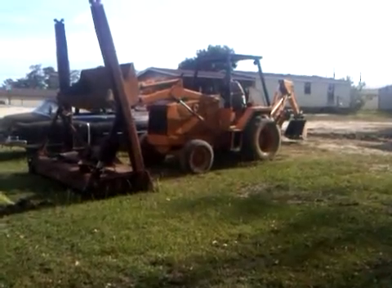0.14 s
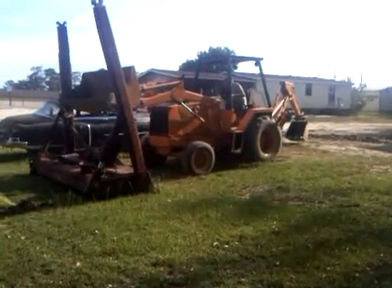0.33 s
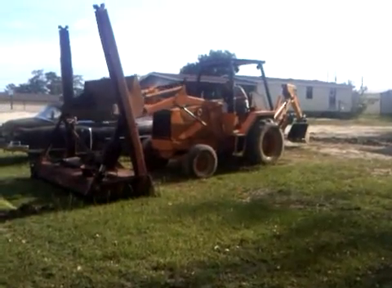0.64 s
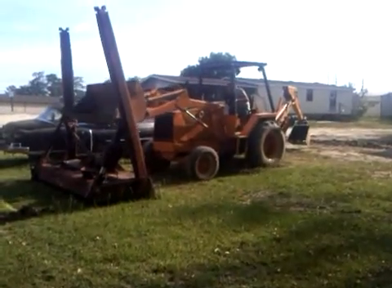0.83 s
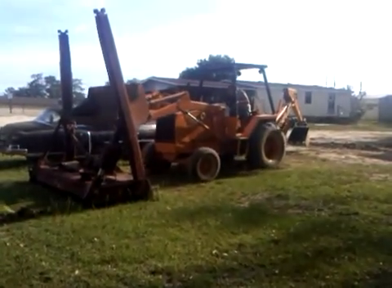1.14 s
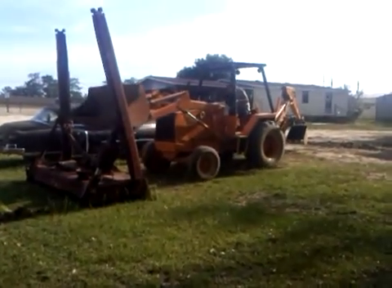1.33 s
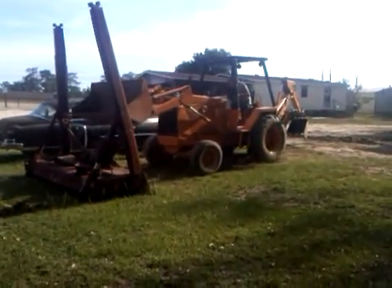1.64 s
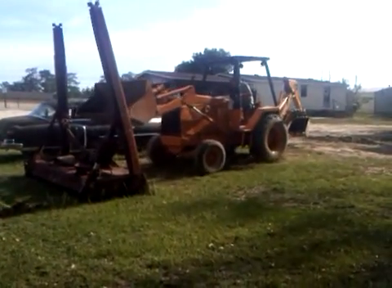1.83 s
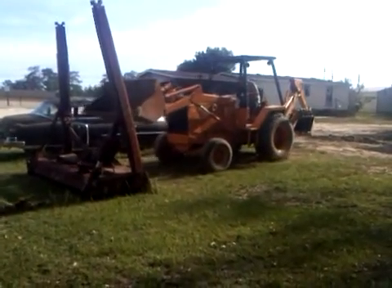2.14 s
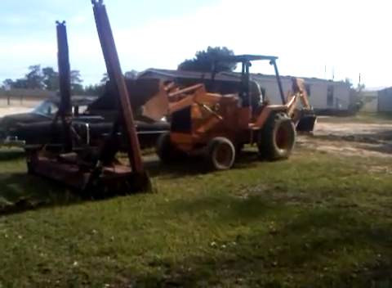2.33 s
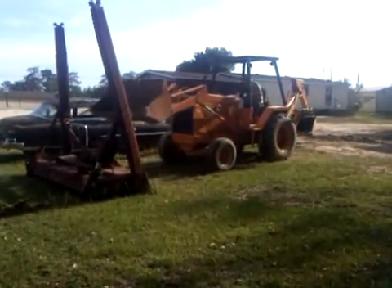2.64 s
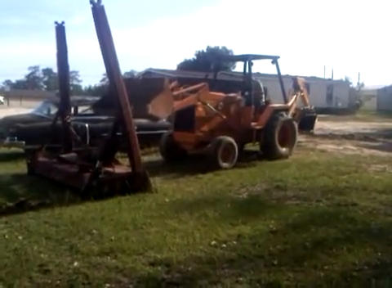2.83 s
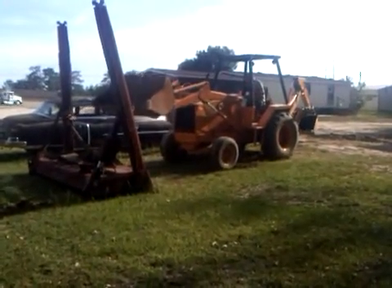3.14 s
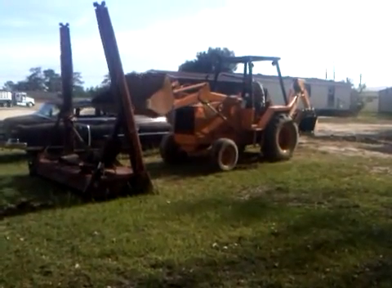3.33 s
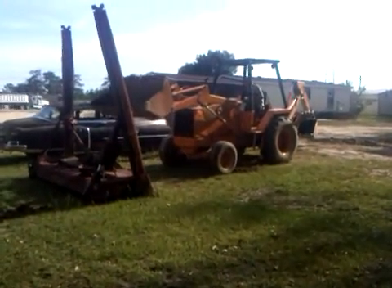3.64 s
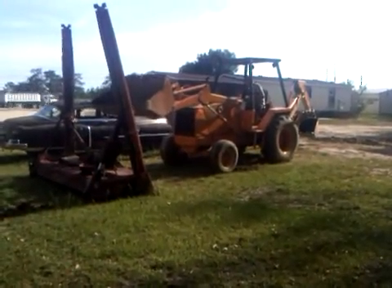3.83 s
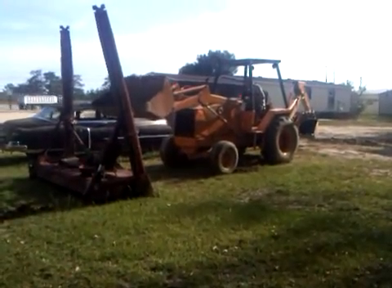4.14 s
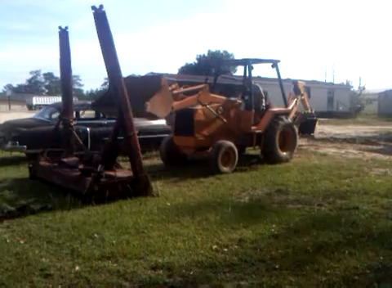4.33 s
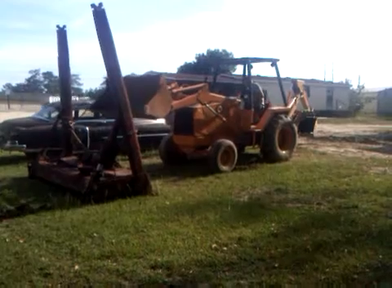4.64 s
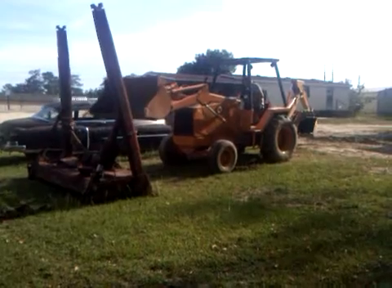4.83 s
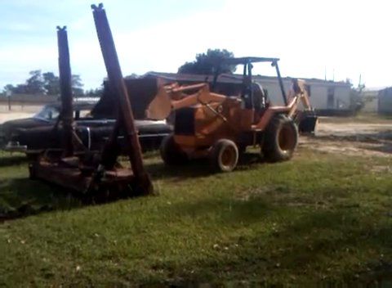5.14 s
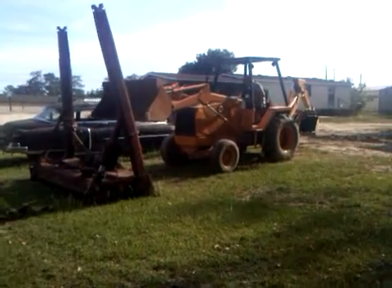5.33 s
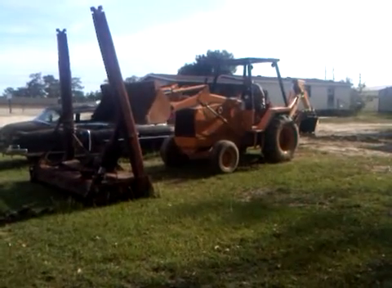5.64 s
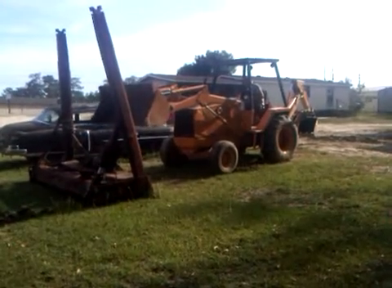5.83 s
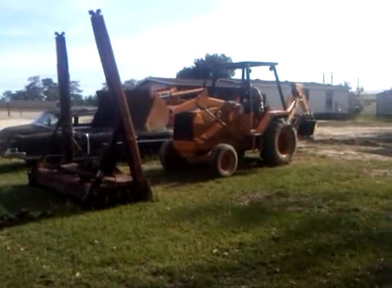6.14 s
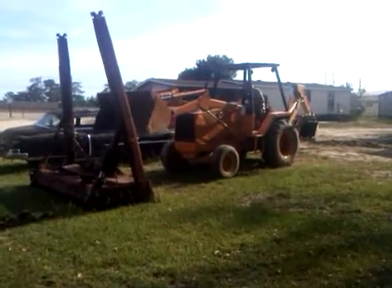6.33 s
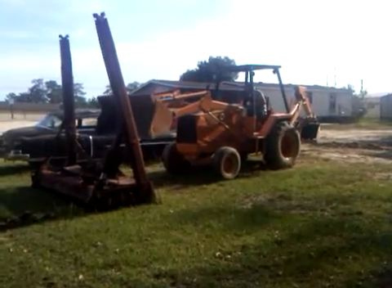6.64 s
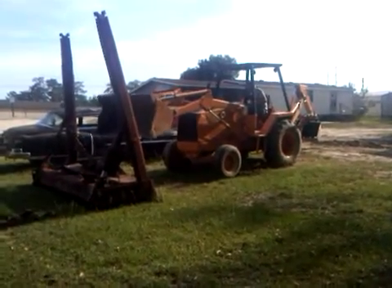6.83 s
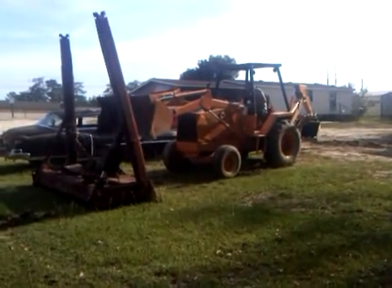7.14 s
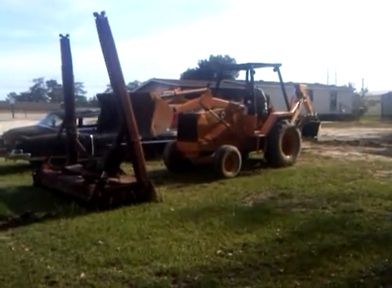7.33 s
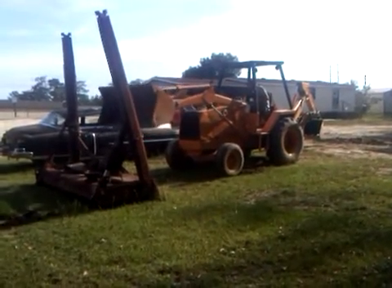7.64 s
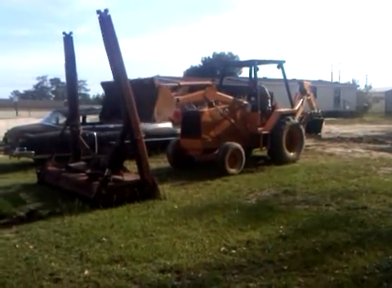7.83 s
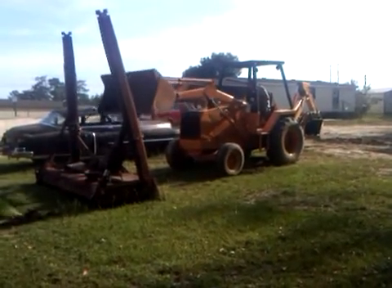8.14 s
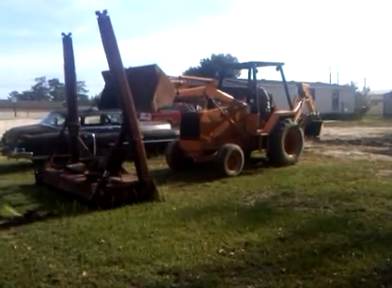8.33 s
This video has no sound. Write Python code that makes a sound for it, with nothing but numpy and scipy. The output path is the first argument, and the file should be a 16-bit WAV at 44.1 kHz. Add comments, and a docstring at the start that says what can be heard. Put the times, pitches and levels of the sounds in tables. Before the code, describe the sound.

A worn diesel backhoe works outdoors at some distance, in dry, single-channel sound with dulled highs. From 0 to 0.5 s it stumbles with deep pipe coughs and clustered steel knocks. Around 0.5 s it revs up: firings quicken into a raspy, booming roar, with fan hum and gear noise swelling, hood panels rattling and bright clanks at about 0.7, 0.8, 1.3 and 1.7 s. Near 2.0 s the throttle shuts, and speed and loudness fall quickly, with a thin belt squeak at 2.3 s. From 2.5 s it hunts at a slow idle, fed roughly every 0.3 s: a few hard thumping, clattering firings, then softer coasting. Bucket and arms clunk dully at 3.3-3.6 s and once at 4.3 s. Short rising belt chirps come at 3.9, 4.2, 4.8, 5.8 and 7.2 s. Coughs strengthen after 6.4 s; steel knocks crowd 7.8-8.4 s, ending mid-idle with a last chirp.

```python
"""An old backhoe loader, some way off in a yard, revs up once and drops to a hunting idle: the governor
feeds a few hard, knocking firings, lets the engine coast, and feeds it again. One train of firings drives
filtered pulses and noise for exhaust, pipe, block, gas, frame, fan and gears. Hums and coughs of the pipe
are decaying tones; loose steel, panels and bucket are struck modes; a slack belt chirps as tone and fuzz."""
import sys
import numpy as np
from scipy import signal
from scipy.fft import rfft, irfft, next_fast_len
from scipy.io import wavfile

SR = 44100
rng = np.random.default_rng(int(sys.argv[2]) if len(sys.argv) > 2 else 0)


def unload_wav(signal):
    """Save mono or channel-first audio to the path in sys.argv[1] as 16-bit WAV at rate SR, clipped to [-1, 1]."""
    wavfile.write(
        sys.argv[1],
        SR,
        np.round(np.clip(np.atleast_2d(signal).T, -1, 1) * 32767).astype(np.int16),
    )


N = 373527
TIME = np.arange(N) / SR

# Feeds of fuel by the governor. Each row: start in seconds, length in seconds, exhaust thump in dB,
# block clatter in dB, hiss in dB.
FEEDS = [(0.01, 0.099, -49.5, -43.5, -52), (0.264, 0.12, -55.5, -40.5, -52), (2.47, 0.06, -45, -44.5, -48),
         (2.798, 0.049, -47, -47.5, -52), (3.107, 0.067, -45.5, -48.5, -53.5),
         (3.44, 0.096, -46.5, -48, -51.5), (3.734, 0.16, -48, -50, -51.5), (4.086, 0.081, -44, -49, -53.5),
         (4.406, 0.074, -47.5, -48.5, -54.5), (4.719, 0.086, -46.5, -52.5, -57.0),
         (4.992, 0.061, -45, -47.5, -53), (5.326, 0.075, -46, -45.5, -49), (5.501, 0.032, -48, -45.5, -46),
         (5.628, 0.096, -55, -50, -54), (5.893, 0.08, -47, -48.5, -56.5), (6.202, 0.16, -46.5, -48.5, -55),
         (6.565, 0.027, -43, -44.5, -53.5), (6.73, 0.21, -49.5, -53, -57), (7.052, 0.088, -48, -48.5, -54),
         (7.317, 0.11, -53, -51, -53), (7.546, 0.088, -43.5, -52, -50), (7.865, 0.053, -49.5, -50, -54),
         (8.106, 0.092, -51.5, -44, -51), (8.316, 0.15, -46, -48.5, -59)]
# Modes of the thin hood panels. Each row: frequency in Hz, relative level in dB, t60 in seconds.
PANELS = [(1740, 4, 0.045), (2024, 7.5, 0.042), (2160, 4, 0.031), (2278, 13, 0.035), (2400, 13.5, 0.036),
          (2635, 8, 0.071), (3060, 1.5, 0.098)]


def amp(db):
    """Decibels to amplitude."""
    return 10 ** (np.asarray(db) / 20)


def evened(x):
    """Scales to rms 1."""
    return x / np.sqrt(np.mean(x ** 2) + 1e-20)


def curves(rows):
    """Each column of a table after the first, interpolated over the times in the first."""
    s, *columns = np.transpose(rows)
    return [np.interp(TIME, s, column) for column in columns]


def add(mix, s, sound):
    """Lays a sound into the mix at time s."""
    part = mix[max(round(s * SR), 0):][:len(sound)]
    part += sound[:len(part)]


def earlier(x, seconds):
    """Moves a signal ahead in time."""
    return np.interp(TIME + seconds, TIME, x)


def blend(idle, fast, share):
    """Equal-power mix of two sounds, each at rms 1."""
    return np.sqrt(1 - share) * evened(idle) + np.sqrt(share) * evened(fast)


def colour(x, points, size=16384):
    """Minimum-phase filter with the given spectrum, interpolated over log frequency."""
    hz, db = np.transpose(points)
    bin_hz = abs(np.fft.fftfreq(size, 1 / SR))
    log_gain = np.log(amp(np.interp(np.log(bin_hz + 1), np.log(hz), db)))
    taps = np.fft.ifft(np.exp(np.conj(signal.hilbert(log_gain)))).real
    return signal.oaconvolve(x, taps[:size // 2])[:N]


def resonate(x, hz, width_hz):
    """One resonance of gain 1."""
    return signal.lfilter(*signal.iirpeak(hz, hz / width_hz, SR), x)


def flutter(db, rate_hz):
    """Gain that wanders at random, with an rms swing in dB."""
    s = TIME[::SR // 300]
    hz = np.fft.rfftfreq(len(s), s[1])
    band = (hz > 6) * np.exp(-(hz / rate_hz) ** 2)
    wander = irfft(rfft(rng.standard_normal(len(s))) * band, len(s))
    return np.interp(TIME, s, amp(db * evened(wander)))


def swell(start, length, shape, times=TIME):
    """Exponential attack up to the start, hold, and release, of height 1."""
    attack_s, hold_share, release_s = shape
    t = times - start
    attack = np.minimum(t, 0) / attack_s
    release = np.maximum(t - hold_share * length, 0) / release_s
    return np.exp(np.maximum(attack - release, -20))


def fed(coast_db, shape, column):
    """Level in dB of one part: the power of coasting plus a swell at each feed, from that column of FEEDS."""
    s = TIME[::20]
    power = sum((amp(row[column]) * swell(row[0], row[1], shape, s)) ** 2 for row in FEEDS)
    return 10 * np.log10(amp(coast_db) ** 2 + np.interp(TIME, s, power))


def firings(speed):
    """One impulse a firing, of even mean power at any speed; firings grow more alike as the engine speeds up."""
    # Strength of each of the four cylinders. Each entry: level in dB.
    cylinders_db = [0.78, 0.016, -0.13, -2]
    # The throttle opens and shuts. Each entry: time in seconds.
    throttle_s = [0.528, 2.024]
    spread_db = 4  # at the lowest speed

    turns = np.cumsum(speed) / SR
    # slip the phase so that each change of fuel falls on a firing
    changes = np.sort([row[0] for row in FEEDS] + list(throttle_s))
    slip = np.unwrap(2 * np.pi * (np.interp(changes, TIME, turns) % 1)) / (2 * np.pi)
    at = np.flatnonzero(np.diff(np.floor(turns - np.interp(TIME, changes, slip))))
    chance = rng.standard_normal(N)[:len(at)] * (speed.min() / speed[at]) ** 2
    train = np.zeros(N)
    train[at] = amp(np.resize(cylinders_db, len(at)) + spread_db * chance) / np.sqrt(speed[at])
    return train


def bursts(train, rise_s, decay_s, steady):
    """Noise that swells at each firing and dies away, over a steady part."""
    t = TIME[:SR // 6]
    shape = (1 - np.exp(-t / rise_s)) ** 2 * np.exp(-t / decay_s)
    power = abs(signal.oaconvolve(train ** 2, shape)[:N])
    return evened(rng.standard_normal(N) * np.sqrt(power / power.mean() + steady))


def pops(train):
    """Compact bumps of exhaust pressure, centred on the firings, each followed by an uneven suck back."""
    # Each row: frequency in Hz, relative gain in dB.
    pop_spectrum = [(8, -30.5), (28, -8), (42, 7), (82, 7), (125, -3.5), (170, -10), (260, -18), (900, -55)]
    return_rad, return_spread_rad = 0.55, 0.3

    hz, db = np.transpose(pop_spectrum)
    size = next_fast_len(N)
    gain = amp(np.interp(np.log(np.fft.rfftfreq(size, 1 / SR) + 1), np.log(hz), db))
    angle = return_rad + return_spread_rad * rng.standard_normal(N)
    # turn the phase of each bump by its own angle
    upright = rfft(train * np.cos(angle), size)
    turned = 1j * rfft(train * np.sin(angle), size)
    return irfft((upright + turned) * gain, size)[:N]


def exhaust_thump(train, puffs, flow, revving):
    """Pulses with ragged gas flow at idle, compact pressure bumps at speed."""
    # Each row: frequency in Hz, relative gain in dB.
    thump_spectrum = [(8, -29.5), (24, 3), (40, -2.5), (53, 14), (66, -7), (84, 5.5), (125, -13),
                      (190, -38.5), (400, -35), (900, -62.5)]
    return blend(colour(puffs + flow, thump_spectrum), pops(train), revving)


def pipe_boom(puffs, flow, revving):
    """At speed clean pulses rule the pipe; at idle ragged gas flow keeps it booming."""
    # Pipe under ragged flow. Each row: frequency in Hz, relative gain in dB.
    gas_spectrum = [(60, -41), (95, -9), (120, 4), (140, -5), (165, -10.5), (205, -6), (250, -4),
                    (300, -20.5), (500, -69.5)]
    # Pipe under clean pulses. Each row: frequency in Hz, relative gain in dB.
    pulse_spectrum = [(80, -25), (106, 16.5), (130, -2), (165, -17.5), (196, -3), (213, 8.5), (236, -12.5),
                      (290, -22.5), (340, -7), (410, -19.5), (520, -10.5), (650, -41.5)]
    ragged = colour(0.7 * puffs + flow, gas_spectrum)
    return blend(ragged, colour(puffs, pulse_spectrum), 0.92 * revving)


def ringing(train, decay_s):
    """Every firing rings the same dense set of modes, so fine strands form at multiples of the firing rate."""
    t = TIME[:SR // 8]
    response = rng.standard_normal(len(t)) * np.exp(-t / decay_s)
    return evened(signal.oaconvolve(train, response)[:N])


def rattle(drive, uneven_db=6, width_hz=35):
    """Each panel mode is shaken by the engine in fits of its own."""
    return evened(sum(amp(db) * resonate(drive, hz, width_hz) * flutter(uneven_db, rate_hz=2.9)
                      for hz, db, _ in PANELS))


def block_clatter(train, revving):
    """The block clatters unevenly at idle and rasps at speed; the engine shakes the hood panels."""
    # Block at idle. Each row: frequency in Hz, relative gain in dB.
    idle_spectrum = [(600, -29.5), (1000, 2), (1220, 6), (1420, -7.5), (1570, 6.5), (1680, 1), (2050, 2.5),
                     (2450, -3), (3000, -3.5), (3700, -5), (4400, -18), (7000, -56.5)]
    # Block at speed. Each row: frequency in Hz, relative gain in dB.
    rasp_spectrum = [(600, -27.5), (1000, -2.5), (1450, -6), (1700, 0.5), (1930, -2.5), (2060, 0),
                     (2200, -6.5), (2400, -4.5), (2650, -9), (3200, -17), (4300, -12.5), (7000, -51.5)]
    # Panel rattle, most in the pick-up of speed. Each row: time in seconds, level in dB against the block.
    rattle_level = [(0.62, -19.5), (0.8, 0), (1.05, -2), (1.45, -11.5)]

    slap = bursts(earlier(train, 0.0076), rise_s=0.0016, decay_s=0.0019, steady=26.0)
    rasp = bursts(earlier(train, 0.0076), rise_s=0.00063, decay_s=0.017, steady=0.34)
    rasp = rasp + 0.8 * ringing(earlier(train, 0.0068), decay_s=0.022)
    rasp = rasp * flutter(1, rate_hz=45)
    uneven_slap = slap * flutter(1.9, rate_hz=56)
    clatter = blend(colour(uneven_slap, idle_spectrum), colour(rasp, rasp_spectrum), revving)
    return evened(clatter + amp(curves(rattle_level)[0]) * rattle(slap))


def gas_hiss(train):
    """Exhaust gas: short noise bursts at the firings over steady noise."""
    # Each row: frequency in Hz, relative gain in dB.
    hiss_spectrum = [(1500, -20.5), (3000, -4.5), (3800, -11), (3990, 1.5), (4200, 5.5), (5000, 3.5),
                     (6200, -1.5), (7000, -8), (7600, -36.5)]
    gas = bursts(earlier(train, 0.0042), rise_s=0.0013, decay_s=0.0042, steady=3.5)
    return evened(colour(gas * flutter(1.87, rate_hz=56), hiss_spectrum))


def frame_rumble(train):
    """Frame shaken by the firings: slow noise bursts over mostly steady noise."""
    # Each row: frequency in Hz, relative gain in dB.
    rumble_spectrum = [(180, -19.5), (290, 2.5), (350, 7), (400, -0.5), (470, 2.5), (540, 3.5), (620, -3),
                       (900, -46.5)]
    shake = bursts(earlier(train, 0.0017), rise_s=0.0049, decay_s=0.048, steady=5.7)
    return evened(colour(shake * flutter(1.9, rate_hz=82), rumble_spectrum))


def fan_and_gear_roar(train):
    """Fan and gears: fluttering noise that swells with the firings."""
    # Each row: frequency in Hz, relative gain in dB.
    roar_spectrum = [(450, -27.5), (630, 0), (705, 10), (750, 5.5), (810, 9), (930, 4.5), (1030, -2.5),
                     (1150, -2.5), (1400, -4.5), (3000, -57.5)]
    churn = bursts(earlier(train, 0.0017), rise_s=0.0017, decay_s=0.034, steady=2.2)
    return evened(colour(churn * flutter(2.0, rate_hz=30), roar_spectrum))


def fan(speed):
    """Belted blades hum between the engine's own tones, gliding with its speed."""
    # Each row: multiple of the blade rate, rms level in dB at full speed before flutter.
    fan_tones = [(1, -44), (2, -52.5), (4, -57.5)]
    blades_per_firing, speed_power = 4.17, 5

    turns = blades_per_firing * np.cumsum(speed) / SR
    hum = sum(amp(db) * np.sin(2 * np.pi * round(k) * turns) * flutter(1.4, rate_hz=30) for k, db in fan_tones)
    return np.sqrt(2) * hum * (speed / speed.max()) ** speed_power


def engine():
    """Each firing thumps out of the pipe, sets it booming, rattles the block and puffs gas."""
    # Governed speed between feeds. Each row: time in seconds, firings per second.
    base_speed = [(0.2, 24.3), (0.55, 33.87), (0.95, 42.16), (1.28, 43.06), (1.6, 39.43), (2.02, 39.74),
                  (2.25, 33), (2.6, 21), (7.8, 21), (8.2, 25.5)]
    # Firing effort between feeds, through the rev and down to coasting. Each row: time in seconds,
    # exhaust thump in dB, block clatter in dB, hiss in dB.
    effort = [(0.17, -60.5, -53, -57), (0.43, -50.5, -43, -49), (0.57, -31.5, -39, -48),
              (0.87, -35, -34.5, -44), (2.02, -37, -36.5, -48), (2.08, -49, -47.5, -54.5),
              (2.4, -56, -50, -52), (2.65, -68.5, -51, -65.5), (5.2, -54, -53.5, -67),
              (8.47, -48, -51, -67.5)]
    # Slower parts between feeds. Each row: time in seconds, pipe boom in dB, frame rumble in dB,
    # roar of fan and gears in dB.
    body = [(0.15, -47.5, -58.5, -54), (0.47, -47, -49.5, -52.5), (0.61, -41, -43.5, -44),
            (0.92, -42, -46, -39.5), (1.2, -38, -42, -38), (1.79, -38, -48.5, -42), (2.06, -44, -46, -39.5),
            (2.12, -46, -54, -49.5), (3, -51, -56.5, -55), (4, -49.5, -59.5, -54), (5, -50.5, -55, -52.5),
            (6.8, -50, -59, -49), (7.8, -49.5, -58, -55), (8.47, -48.5, -57.5, -50)]
    # The frame shudders as the loader works. Each row: start in seconds, length in seconds, level in dB.
    shudders = [(3.18, 0.082, -48), (3.363, 0.02, -45), (3.5, 0.038, -49), (4.319, 0.49, -50),
                (4.796, 0.64, -53.5), (8.326, 0.14, -48)]
    # Answers to a feed or shudder. Each: attack in seconds, hold as a share of its length, release in seconds.
    thump_shape = (0.11, .78, 0.082)
    clatter_shape = (0.037, 0.83, 0.079)
    hiss_shape = (0.039, 1.54, 0.012)
    surge_shape = (.05, 1.1, .07)
    shudder_shape = (0.01, 0.42, 0.021)
    # what a feed adds
    surge_firings_per_s = 3
    boom_surge_db, rumble_surge_db, roar_surge_db = 4, 3.5, 3

    surge = np.max([swell(row[0], row[1], surge_shape) for row in FEEDS], axis=0)
    speed = curves(base_speed)[0] + surge_firings_per_s * surge
    thump_db, clatter_db, hiss_db = curves(effort)
    thump_db = fed(thump_db, thump_shape, column=2)
    clatter_db = fed(clatter_db, clatter_shape, column=3)
    hiss_db = fed(hiss_db, hiss_shape, column=4)
    boom_db, rumble_db, roar_db = curves(body)
    shudder = sum(amp(db) * swell(s, length, shudder_shape) for s, length, db in shudders)
    # revving: turns fast and still fires hard
    revving = np.clip(np.minimum((speed - 25) / 9, (thump_db + 52) / 12), 0.06, 0.98)

    train = firings(speed)
    puffs = evened(earlier(train, 0.0022))
    flow = bursts(puffs, rise_s=0.002, decay_s=0.016, steady=0.1)
    out = amp(thump_db) * exhaust_thump(train, puffs, flow, revving)
    out += amp(boom_db + boom_surge_db * surge) * pipe_boom(puffs, flow, revving)
    out += amp(clatter_db) * block_clatter(train, revving)
    out += amp(hiss_db) * gas_hiss(train)
    out += np.hypot(amp(rumble_db + rumble_surge_db * surge), shudder) * frame_rumble(train)
    out += amp(roar_db + roar_surge_db * surge) * fan_and_gear_roar(train)
    return out + fan(speed)


def hums():
    """The pipe's resonance swells by itself for a few cycles and dies away."""
    # Each row: start in seconds, envelope peak in dB, pitch in Hz.
    pipe_hums = [(0.018, -31.5, 110.5), (0.362, -39, 144), (0.43, -40.5, 143.3), (2.95, -38.5, 114.5),
                 (4.156, -36.5, 115.3)]
    rise_s, decay_s = 0.0079, 0.053

    out, t = np.zeros(N), TIME[:SR // 4]
    shape = (1 - np.exp(-t / rise_s)) ** 2 * np.exp(-t / decay_s)
    for s, db, hz in pipe_hums:
        add(out, s, amp(db) * shape / shape.max() * np.sin(2 * np.pi * hz * t))
    return out


def strike(modes, rise_s, chatter_s, crack_db, crack_band_hz):
    """Steel parts chatter together for a moment: a crack, and the ring of their modes. Peak 1."""
    t = TIME[:SR // 4]
    contact = rng.standard_normal(len(t)) * np.exp(-t / chatter_s) * (1 - np.exp(-t / rise_s)) ** 2
    modal = sum(amp(db - 60 * t / t60) * np.sin(2 * np.pi * hz * t) for hz, db, t60 in modes)
    ring = signal.fftconvolve(contact, modal)[:len(t)]
    crack_filter = signal.butter(2, crack_band_hz, "bandpass", fs=SR, output="sos")
    crack = signal.sosfilt(crack_filter, contact)
    sound = evened(ring) + amp(crack_db) * evened(crack)
    return sound / abs(sound).max()


def steel_knocks():
    """Loose steel knocks: struck modes for the ring, a short noise burst for the dead clack."""
    # Each row: start in seconds, ring peak in dB, peak of the clack's noise envelope in dB.
    knocks = [(0.021, -34, -40.5), (0.06, -27, -37), (0.257, -45, -38), (0.294, -37, -44),
              (0.324, -29, -52), (0.354, -38, -33.5), (0.432, -48, -42), (0.458, -42, -34.5),
              (0.522, -47, -35), (0.552, -36, -36), (1.851, -24.5, -45), (1.964, -31, -40),
              (1.998, -40, -50), (2.735, -33.5, -50), (3.486, -38, -43), (3.525, -34.5, -38),
              (3.572, -33.5, -44), (3.727, -43, -55), (3.775, -33.5, -52), (3.814, -40, -41),
              (3.854, -38, -65), (4.043, -39, -46), (4.081, -33, -53), (4.127, -29.5, -53),
              (4.446, -33, -52), (4.71, -38, -53), (4.76, -44, -44), (4.947, -39, -43), (4.986, -40, -60),
              (5.315, -30.5, -41), (5.629, -32, -61), (5.667, -36, -47), (5.852, -37, -52),
              (5.889, -36, -53), (5.98, -35, -62), (6.21, -31, -45), (6.263, -47, -42), (6.557, -37, -43),
              (6.748, -37, -54), (6.865, -33, -52), (7.083, -35, -41), (7.626, -36, -42), (7.67, -33, -62),
              (7.814, -28.5, -51), (7.856, -34, -39), (7.895, -32, -56), (7.933, -40, -39.5),
              (8.072, -41, -44), (8.099, -39, -42), (8.138, -31, -31), (8.173, -24.5, -38),
              (8.284, -38, -42), (8.322, -32, -34.5), (8.37, -33, -40.5)]
    # Modes before spread. Each row: frequency in Hz, relative level in dB, t60 in seconds.
    steel = [(556, -20, 0.077), (1190, -7, 0.041), (1539, -7, 0.085), (1589, 4, 0.093), (1784, -3.5, 0.069),
             (2220, -13, 0.06), (3900, -16.5, 0.14)]
    # Each row: frequency in Hz, relative gain in dB.
    clack_spectrum = [(200, -19.5), (600, -10), (950, 1), (1200, 2), (1700, 2), (2300, -13.5), (3000, -18),
                      (3800, -9), (6500, -26.5)]
    clack_rise_s, clack_decay_s = 0.004, 0.01
    detune, mode_spread_db = 0.008, 3  # detune as a fraction of pitch

    out, blows, t = np.zeros(N), np.zeros(N), TIME[:SR // 4]
    blow = (1 - np.exp(-t / clack_rise_s)) ** 2 * np.exp(-t / clack_decay_s)
    for s, ring_db, clack_db in knocks:
        pitch = 1 + detune * rng.standard_normal()
        modes = [(hz * pitch, db + mode_spread_db * rng.standard_normal(), t60) for hz, db, t60 in steel]
        knock = strike(modes, rise_s=0.003, chatter_s=0.007, crack_db=-10, crack_band_hz=(1350, 2100))
        add(out, s, amp(ring_db) * knock)
        add(blows, s, amp(clack_db) * blow / blow.max())
    return out + blows * evened(colour(rng.standard_normal(N), clack_spectrum))


def coughs():
    """A low swing of the air at each extra hard firing, with a sharp crest that leaves the pipe ringing."""
    # Each row: crest time in seconds, peak in dB.
    hard_firings = [(0.025, -27.5), (0.101, -32), (0.261, -29), (0.294, -38), (0.327, -28), (0.433, -38),
                    (0.468, -42), (0.495, -43), (0.527, -31.5), (2.524, -28), (2.782, -32.5), (3.778, -35),
                    (3.82, -28.5), (3.858, -36), (5.06, -41), (5.078, -30), (5.363, -37), (5.633, -36),
                    (5.673, -33.5), (5.856, -41), (5.981, -32), (6.358, -33), (6.433, -29), (6.525, -40),
                    (6.608, -29), (6.699, -29), (6.789, -26), (6.861, -31), (7.052, -37), (7.094, -43),
                    (7.267, -32.5), (7.357, -27), (7.672, -34), (7.899, -25.5), (7.939, -31),
                    (8.179, -30.5)]
    # Attack in seconds, hold as a share of length, release in seconds.
    ring_shape = (.005, 0, .02)
    swing_hz, swing_width_s = 54.3, 0.011
    ring_mean_hz, ring_spread, ring_db = 114.3, 0.056, -7.5  # dB against the swing

    t = np.arange(-SR // 8, SR // 8) / SR
    swing = np.cos(2 * np.pi * swing_hz * t) * np.exp(-abs(t) / swing_width_s)
    out = np.zeros(N)
    for s, db in hard_firings:
        hz = ring_mean_hz * (1 + ring_spread * rng.standard_normal())
        ring = np.cos(2 * np.pi * hz * t) * swell(0, 0, ring_shape, t)
        cough = swing + amp(ring_db) * ring
        add(out, max(s + t[0], 0), (amp(db) * cough / cough.max())[t >= -s])
    return out


def panel_clanks():
    """Bright clanks: chattering contact rings the hood panel modes."""
    # Each row: start in seconds, peak in dB.
    clanks = [(0.288, -32), (0.324, -23.5), (.695, -24), (0.789, -26.5), (0.986, -30.5), (1.265, -29),
              (1.661, -27), (3.347, -32.5), (4.398, -36), (5.353, -30.5), (8.403, -32)]
    out = np.zeros(N)
    for s, db in clanks:
        clank = strike(PANELS, rise_s=0.0013, chatter_s=0.014, crack_db=-5.0, crack_band_hz=(2300, 4000))
        add(out, s, amp(db) * clank)
    return out


def belt_chirps():
    """Slack belt slips: a squeak, part tone and part fuzz, peaks early, warbles and fades as it rises."""
    # Each row: start in seconds, rms level before the envelope in dB, length in seconds, mid pitch in Hz.
    chirps = [(2.262, -52, 0.32, 3330), (2.884, -54, 0.097, 3260), (3.883, -47.5, 0.15, 3310),
              (4.192, -45.5, 0.12, 3250), (4.56, -52.5, 0.1, 3340), (4.817, -52.5, 0.16, 3340),
              (5.776, -50, 0.087, 3350), (7.19, -54, 0.16, 3565), (8.397, -46.5, 0.11, 3600)]
    width_hz, glide_hz, warble_hz = 300, 480, 90
    clear = 0.35  # tone's share of the power
    skew = 0.38  # under 1 peaks early

    out = np.zeros(N)
    for s, db, length_s, hz in chirps:
        u = np.linspace(0, 1, int(length_s * SR))
        noise = rng.standard_normal((3, SR))[:, :len(u)]
        real, imag, slip = signal.lfilter(*signal.butter(2, width_hz / 2, fs=SR), noise)
        pitch_hz = hz + glide_hz * (u - 0.5) + warble_hz * evened(slip)
        fuzz = evened(real) + 1j * evened(imag)
        grip = np.sqrt(clear) + np.sqrt((1 - clear) / 2) * fuzz
        squeak = (grip * np.exp(2j * np.pi * np.cumsum(pitch_hz) / SR)).real
        add(out, s, amp(db) * evened(squeak) * np.sin(np.pi * u ** skew) ** 2)
    return out


def bucket_clunks():
    """Bucket and arms clunk dully: struck modes with a decaying sine thud under them."""
    # Each row: start in seconds, ring peak in dB, thud level before decay in dB, thud pitch in Hz.
    clunks = [(3.347, -34, -45, 393), (3.369, -37.5, -30.5, 221), (3.48, -41, -47, 95),
              (3.504, -33, -33, 129), (3.522, -29.5, -36.5, 346), (3.546, -29.5, -34, 264),
              (3.62, -37.5, -34.5, 200), (4.297, -32.5, -52, 218)]
    # Each row: frequency in Hz, relative level in dB, t60 in seconds.
    bucket = [(235, 8, 0.21), (325, -12, 0.37), (401, 5, 0.17), (533, -3, 0.25), (710, -8, .07),
              (1240, -5, 0.029), (2325, -6, 0.034)]
    thud_decay_s = 0.011

    out, t = np.zeros(N), TIME[:SR // 4]
    for s, ring_db, thud_db, thud_hz in clunks:
        thud = np.sin(2 * np.pi * thud_hz * t) * np.exp(-t / thud_decay_s)
        ring = strike(bucket, rise_s=0.00092, chatter_s=0.015, crack_db=1, crack_band_hz=(200, 1400))
        add(out, s, amp(ring_db) * ring + amp(thud_db) * thud)
    return out


def scene():
    """The machine in the open, as one channel."""
    steelwork = steel_knocks() + panel_clanks() + bucket_clunks()
    return (engine() + hums() + steelwork + coughs() + belt_chirps())[None]


def record(dry):
    """Narrow band: a linear-phase low-pass dulls the top."""
    cutoff_hz = 7450
    taps = signal.firwin(401, cutoff_hz, window=("kaiser", 8), fs=SR)
    return signal.oaconvolve(dry, taps[None], "same")


dry = scene()
out = record(dry)
unload_wav(out)
```